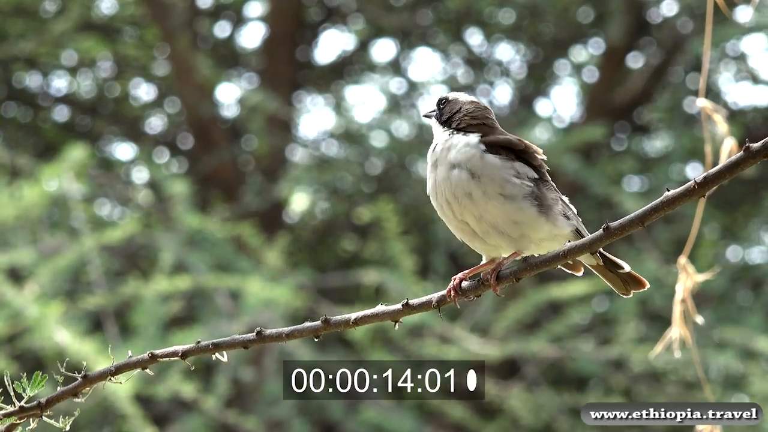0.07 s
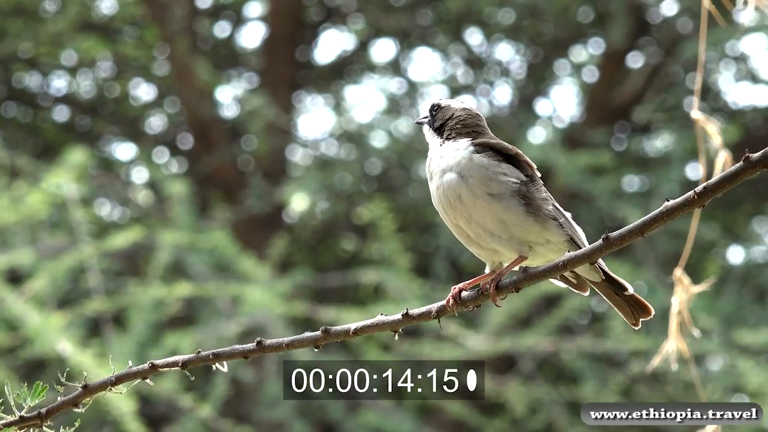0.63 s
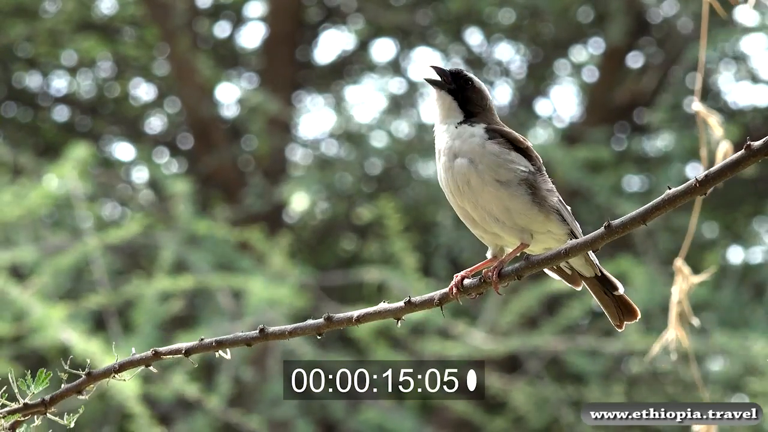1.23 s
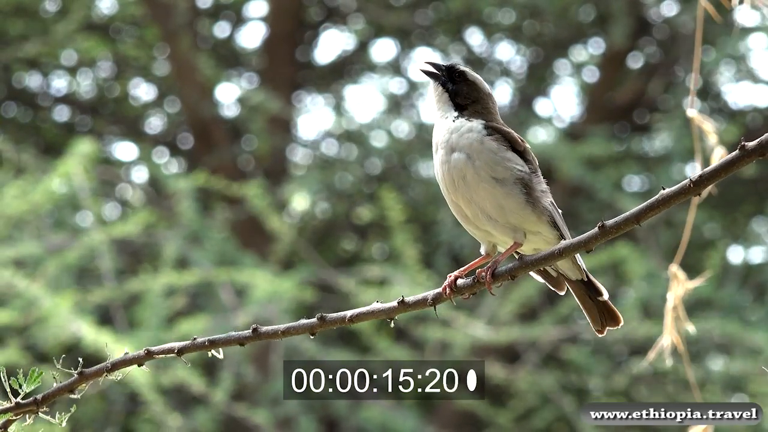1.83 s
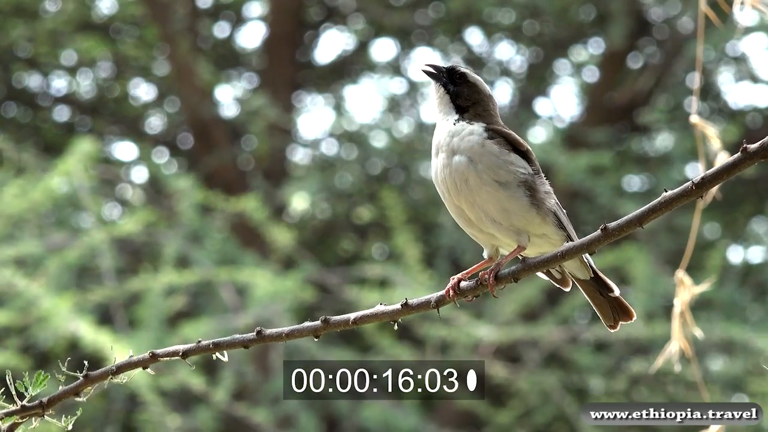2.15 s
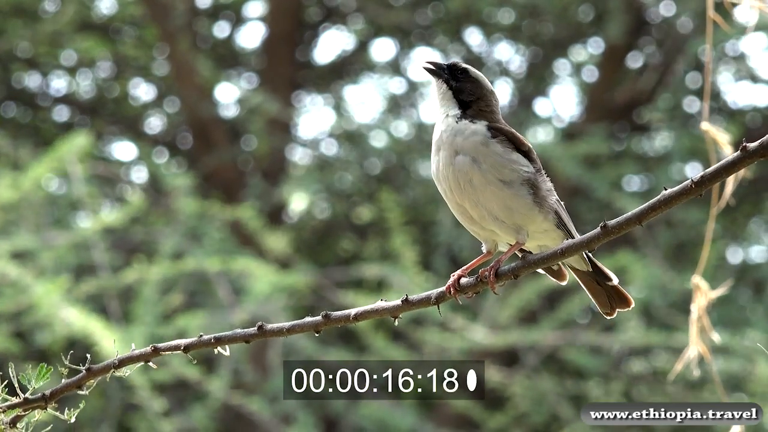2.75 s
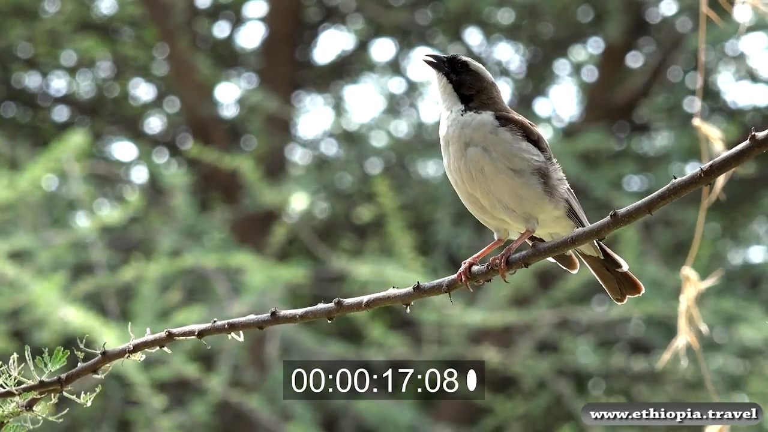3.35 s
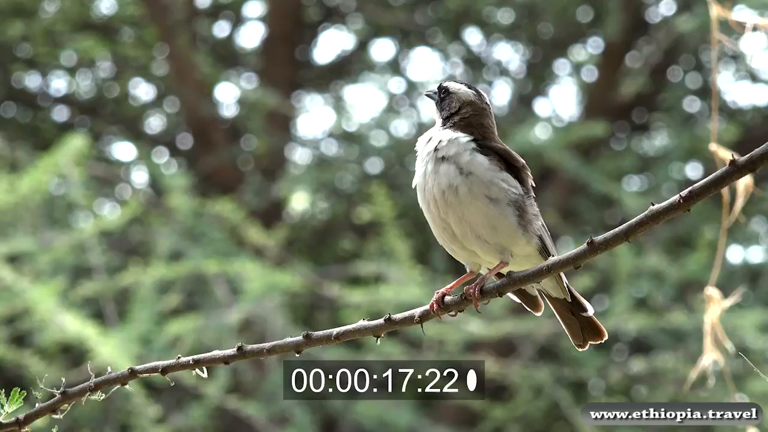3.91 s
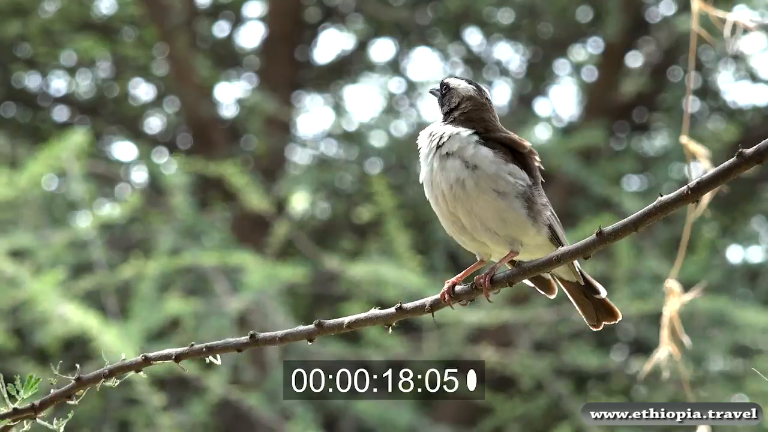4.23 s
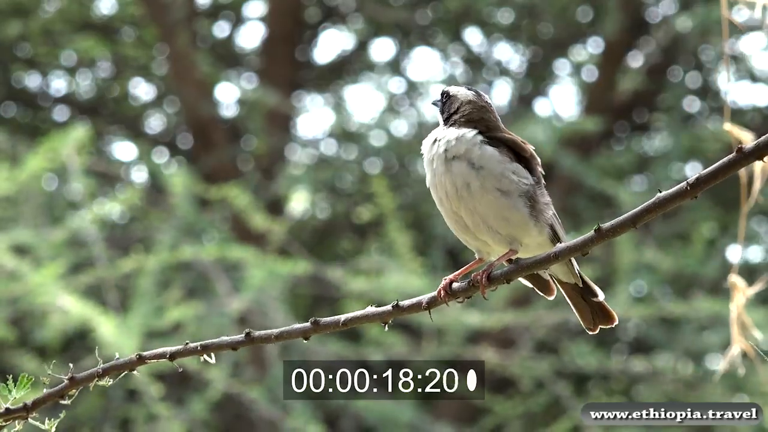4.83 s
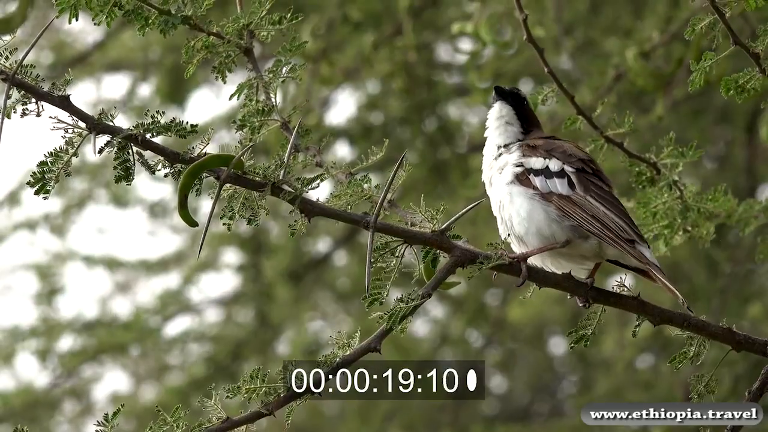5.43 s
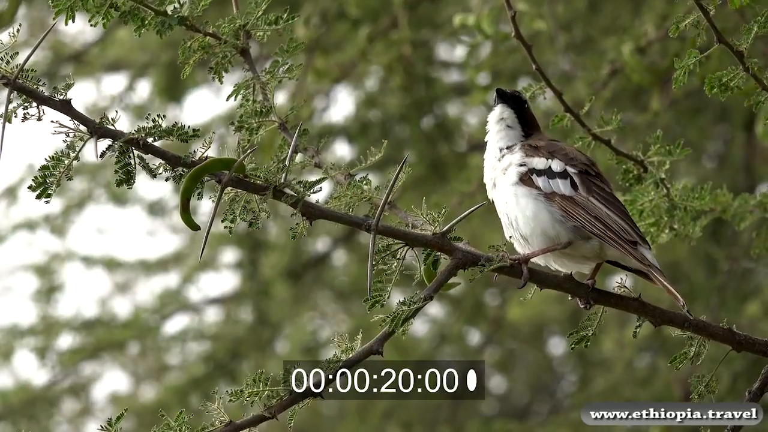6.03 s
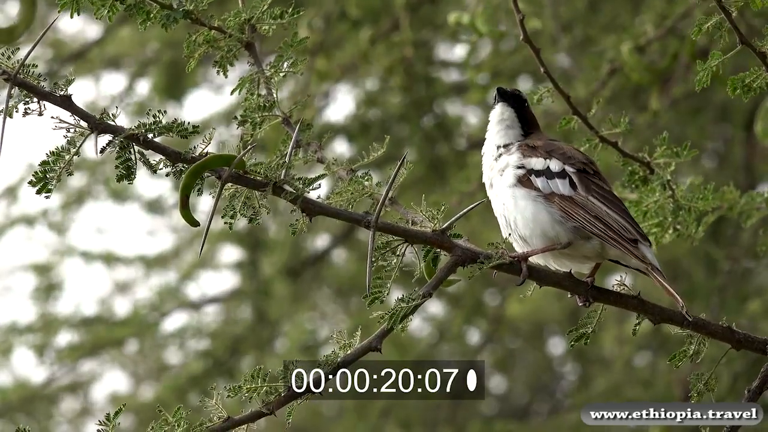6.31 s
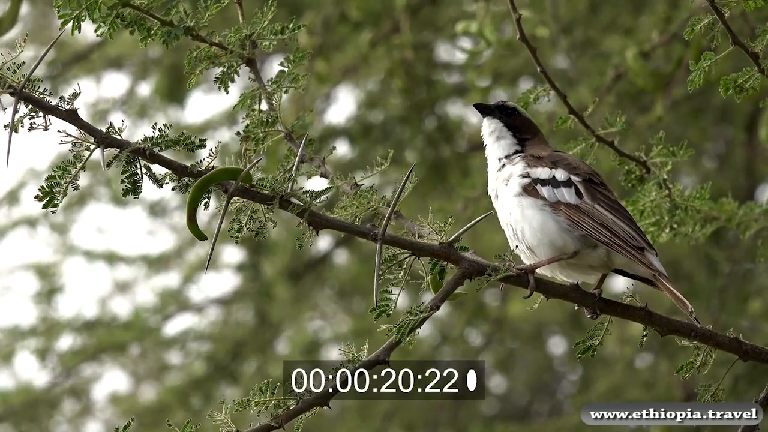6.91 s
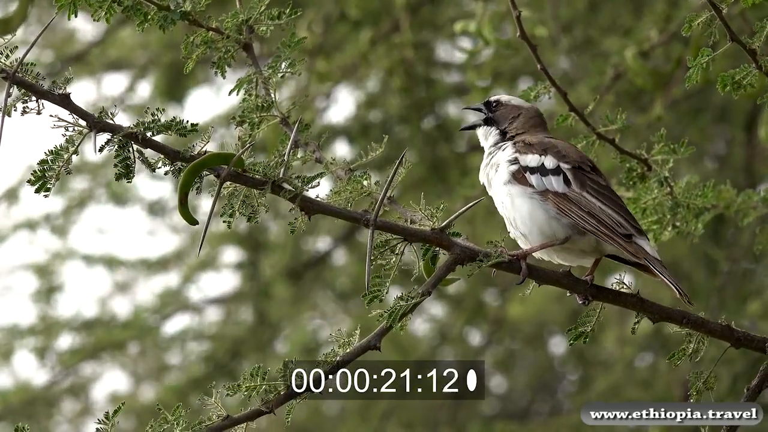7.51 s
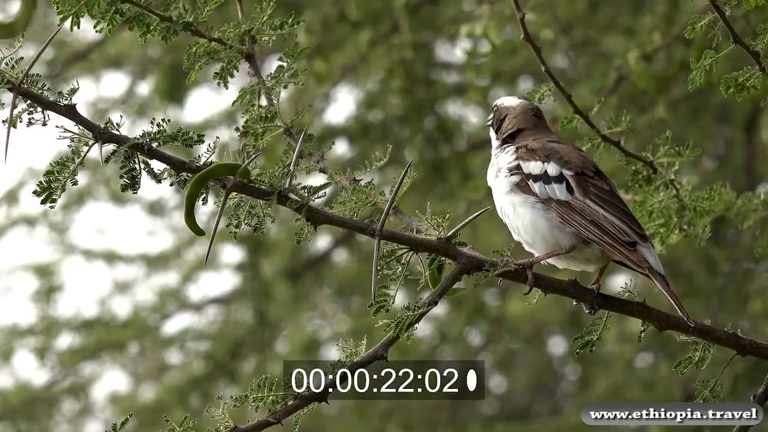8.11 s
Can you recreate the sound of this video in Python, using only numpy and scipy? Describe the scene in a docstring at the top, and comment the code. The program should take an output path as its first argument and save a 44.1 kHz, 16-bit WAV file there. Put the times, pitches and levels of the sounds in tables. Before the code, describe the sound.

Outdoors among trees, a songbird near the microphone starts with a quiet twitter, then breaks into fast, bright chatter of sliding chirps, clicks and buzzes. A low puff of wind hits the microphone early, over a faint hiss of leaves. The song stops briefly halfway through, then resumes in shorter clusters of squeaks, creaks and whistles, now with an even outdoor rumble behind it.

```python
"""A dull rush of air and a soft twitter come first, then a sparrow-weaver chatters on a branch close by.
Its voice box (the syrinx) makes gliding squeaks, ticks, rasps and buzzes, at times two at once, one from
each of its two sides. Leaves hiss, twigs scatter the song and a breeze bumps the microphone.
At five seconds the scene cuts to another perch, with a steady outdoor rumble behind the bird."""
import sys
import numpy as np
from scipy import signal
from scipy.fft import rfft, irfft
from scipy.io import wavfile

SR = 44100
rng = np.random.default_rng(int(sys.argv[2]) if len(sys.argv) > 2 else 0)


def materialize(psi):
    """Save the field psi as 16-bit PCM at rate SR to the path in sys.argv[1].

    A 1-D psi becomes a single channel; in a 2-D psi each row is a channel.
    """
    bounded = np.clip(np.atleast_2d(psi).T, -1, 1)
    quanta = np.round(bounded * 32767).astype(np.int16)
    wavfile.write(sys.argv[1], SR, quanta)


N = 359415
CUT_S = 5.017   # the second perch begins
CUTOFF_HZ = 16000
USUAL_NOTE_DB = -17.5
SWELL_DB_PER_S = 25   # the longer an arch or buzz, the softer it starts


def from_db(db):
    """Turn decibels into a multiplier."""
    return 10 ** (np.asarray(db) / 20)


def rms_one(x):
    """Scale a sound to an average power of 1."""
    return x / np.sqrt(np.mean(x ** 2))


def in_time(rows):
    """Join (time, value) points into a curve with one value per sample."""
    return np.interp(np.arange(N) / SR, *np.transpose(rows))


def at_hz(points, hz):
    """Read the level in dB at any frequency, between (frequency, level) points."""
    freqs, db = np.transpose(points)
    return np.interp(np.log(hz + 1), np.log(freqs), db)


def low_noise(size, top_hz):
    """Random wavering of power 1, mostly slower than top_hz."""
    return rms_one(signal.sosfilt(signal.butter(2, top_hz, fs=SR, output="sos"), rng.standard_normal(size)))


def air(colour, side_db=-19):
    """Noise with a given colour (its mix of low and high), nearly alike left and right."""
    gain = from_db(at_hz(colour, np.fft.rfftfreq(N, 1 / SR)))
    mid, side = rms_one(irfft(rfft(rng.standard_normal((2, N))) * gain, N))
    return mid + from_db(side_db) * np.array([side, -side])


def rumble(level_db=-34.5):
    """The steady low noise of the outdoors."""
    # colour of the rumble: f/Hz, level/dB
    colour = [(25, -20.5), (90, -4), (500, -14.5), (3000, -19), (15000, -50.5)]
    return from_db(level_db) * air(colour)


def leaves(level_db=-51):
    """Leaves give a faint, even hiss."""
    # colour of the hiss: f/Hz, level/dB
    colour = [(150, 0), (1500, -14.5), (5500, -6), (13000, -19.5)]
    return from_db(level_db) * air(colour)


def rush():
    """A dull rush of noise that fades within the first second."""
    # loudness of the rush: t/s, level/dB
    loudness = [(.46, -42.5), (.7, -64)]
    # colour of the rush: f/Hz, level/dB
    colour = [(400, -14.5), (1700, -7), (15000, -24.5)]
    return from_db(in_time(loudness)) * air(colour)


def breeze(lump_db=5.8):
    """Moving air bumps the microphone in low, uneven lumps."""
    # strength of the breeze: t/s, level/dB
    strength = [(.95, -53), (1.03, -25), (1.2, -41.5), (2.35, -53.5), (2.65, -70), (3.4, -56), (4.5, -59)]
    bumps = from_db(in_time(strength)) * low_noise(N, top_hz=109)
    return bumps * from_db(lump_db * low_noise(N, top_hz=7.5))


def foliage(song, near_db, near_t60=0.13, far_db=-25, far_t60=0.81, side_db=-11):
    """Near twigs give a short echo, far trees a faint tail; t60 is the seconds to fade by 60 dB."""
    t = np.arange(SR // 2) / SR
    decay = sum(from_db(db - 60 * t / t60) * np.sqrt(np.log(10 ** 6) / (t60 * SR))
                for db, t60 in ((near_db, near_t60), (far_db, far_t60)))
    echoes = decay * rng.standard_normal((2, len(t))) * (t > .002)
    mid, side = signal.fftconvolve(song[None], echoes, axes=1)[:, :N]
    return song + mid + from_db(side_db) * np.array([side, -side])


def first_perch(song, shade_hz=8250, sheen_hz=10200, sheen_db=3):
    """Here the song is brighter and comes from the right; on the left it is softer and duller."""
    sheen = from_db(at_hz([(shade_hz, 0), (sheen_hz, sheen_db)], np.fft.rfftfreq(N, 1 / SR)))
    left, right = foliage(irfft(rfft(song) * sheen, N), near_db=-7.0)
    left = signal.lfilter(*signal.iirnotch(shade_hz, Q=3, fs=SR), left)
    return np.array([left, right]) * from_db([[-1.6], [1.4]])


def throat_and_beak(pitch, level_db, beak_hz, beak_db):
    """The throat colours the harmonics (multiples of the pitch); the beak lifts those near beak_hz."""
    # colour of the throat: f/Hz, level/dB
    throat = [(500, -6), (1000, -12.5), (2200, -2), (4600, -2), (6200, -9.5), (8000, -7.5), (11000, -25.5),
              (14000, -25.5)]
    k = np.arange(1, CUTOFF_HZ / pitch.min())[:, None]
    hz = k * pitch
    beak = beak_db * np.exp(-(np.log2(hz / beak_hz) / .5) ** 2)
    dulling_db_per_octave = 0.16 * (USUAL_NOTE_DB - level_db)   # softer notes are duller
    gain = from_db(at_hz(throat, hz) + beak - dulling_db_per_octave * np.log2(k)) * (hz < CUTOFF_HZ)
    harmonics = gain * np.cos(2 * np.pi * k * np.cumsum(pitch) / SR)
    return np.sum(harmonics, axis=0) / np.linalg.norm(gain, axis=0)


def add_note(song, start, level_db, beak_hz, arc, hoarse, warble=0, warble_hz=101.98,
             slowness=1, fade_db=0, swell_db=0, beak_db=10.0):
    """One side of the syrinx vibrates along arc, a pitch curve in Hz, and adds a note to the song."""
    # the vibration takes some cycles to build up and to die, so low notes swell slowly
    cycles = slowness * np.array([16.0, 12])
    lead, trail = np.minimum(cycles / arc[[0, -1]] * SR, len(arc) / 2).astype(int) // 2 + 1
    arc = np.pad(arc, (lead, trail), mode="edge")
    size = len(arc)
    # a hoarse voice shakes in pitch (jitter) and in loudness (flutter)
    hoarse = np.clip(hoarse, 0, 1.2)
    jitter, flutter = .006 + .018 * hoarse, .13 + .42 * hoarse
    # slack membranes, at low pitch, vibrate less evenly
    waver = jitter * np.sqrt(beak_hz / arc) * low_noise(size, top_hz=600)
    # each swing of the warble jumps up and slides down; the slide down is the loud half
    swing_hz = warble_hz * (1 + 0.137 * low_noise(size, top_hz=87))
    angle = 2 * np.pi * np.cumsum(swing_hz) / SR
    pitch = arc * np.exp(warble * (np.sin(angle) + 0.25 * np.sin(2 * angle)) + waver)
    throb = 1 - 2.5 * warble * np.cos(angle)
    tone = throat_and_beak(pitch, level_db, beak_hz, beak_db)
    tone = rms_one(tone * (1 + flutter * low_noise(size, top_hz=470)) * throb)
    i = np.arange(size)
    soft_edges = np.sin(np.pi / 2 * np.clip(np.minimum(i / lead, i[::-1] / trail) / 2, 0, 1)) ** 2
    soft_start_db = swell_db * np.maximum(1 - 2 * i / size, 0) ** 2
    pressure_db = 3.0 * np.log2(arc / arc.max())   # air pressure raises pitch and loudness together
    note = tone * soft_edges * from_db(level_db - soft_start_db + pressure_db + fade_db * (.5 - i / size))
    first = int(start * SR) - lead
    song[first:first + size] += note[:N - first]


def arch(length, turn_hz, place, bend):
    """A pitch curve that turns at place (0 start, 1 end); its farther end is bend octaves lower."""
    way = np.linspace(0, 1, max(int(length * SR), 2))
    return turn_hz * 2 ** (-bend * ((way - place) / max(place, 1 - place)) ** 2)


def twitter(song, start_s=0.23, last_s=0.5, last_db=-37, typical_hz=1100, length_s=0.028):
    """Ten soft, random squeaks grow louder and lead into the song."""
    for start, (octaves, place, bend) in zip(np.linspace(start_s, last_s, 10), rng.random((10, 3))):
        hz = typical_hz * 2 ** (octaves - .5)
        level_db = last_db + 10 * np.log10(start / last_s)
        add_note(song, start, level_db, 2 * hz, arch(length_s, hz, place, bend), hoarse=0.46)


def drawls(song):
    """Two long notes, beak half open: a creak tightens to a nasal tone, a whistle drops to a squawk."""
    # long notes: level/dB, beak resonance/Hz, warble depth, pitch path as points of (t/s, f/Hz)
    notes = [(-23.5, 3900, 0.039, [(5.495, 190.2), (5.61, 675.5), (5.735, 691), (5.75, 540)]),
             (-16.5, 4600, 0, [(6.308, 1357), (6.322, 2330), (6.36, 2680), (6.371, 2430), (6.382, 789),
             (6.397, 768), (6.409, 1104), (6.438, 600)])]
    for level_db, beak_hz, depth, path in notes:
        times, hz = np.transpose(path)
        arc = np.exp(np.interp(np.arange(times[0], times[-1], 1 / SR), times, np.log(hz)))
        add_note(song, times[0], level_db, beak_hz, arc, hoarse=0, warble=depth, beak_db=5.5)


def flicks(song, rise_s=.018, sharpness=1.4):
    """A twitch tightens the syrinx: the pitch shoots up to a point, then relaxes."""
    # twitches: top t/s, fall time/s, level/dB, top f/Hz, slack f/Hz, hoarseness (0 is clean)
    notes = [(1.516, 0.057, -22, 2330, 1111, 0.06), (2.099, 0.033, -16.5, 1793, 952, 0),
             (2.155, 0.035, -17.5, 2130, 932, 0), (2.957, 0.075, -26, 2760, 1220, 0.03),
             (3.636, 0.033, -20.5, 2070, 996, 0), (3.694, 0.048, -20.5, 2552, 1163, 0),
             (3.979, 0.028, -18, 2300, 1354, 0.5), (5.152, 0.05, -13.5, 4450, 1584, 0.16),
             (5.219, 0.068, -16, 3080, 1750, 0), (5.266, 0.072, -20.5, 1433, 781, 0.75),
             (6.005, 0.03, -20.5, 1770, 835, 0.3), (6.759, 0.076, -22.5, 2365, 1118, 0.45)]
    for top_s, fall, level_db, top_hz, slack_hz, hoarse in notes:
        t = np.arange(-rise_s, fall, 1 / SR)
        tension = np.clip(1 - np.maximum(-t / rise_s, t / fall), 0, 1) ** sharpness
        arc = slack_hz * (top_hz / slack_hz) ** tension
        beak_hz = 3410 * 2 ** (-0.06 * (level_db - USUAL_NOTE_DB))   # lower for a louder flick
        add_note(song, top_s - rise_s, level_db, beak_hz, arc, hoarse)


def buzzes(song, beak_hz=4980, rasp_beak_hz=3280, rasp_db=-10):
    """A fast warble turns an arching note into a buzz."""
    # buzzes: start t/s, length/s, level/dB, turn f/Hz, place of the turn (0-1), bend/octaves, warble depth
    notes = [(0.709, 0.074, -36, 5200, 0.7, 0.067, 0.08), (1.706, 0.052, -16.5, 4790, 1, 0.88, 0.11),
             (2.327, 0.12, -16, 5036, 0.7, 0.32, 0.09), (3.047, 0.11, -20.5, 2210, 0.4, 0.15, 0.07),
             (3.211, 0.085, -18.5, 2676, 0.34, -0.029, 0.045),
             (3.856, 0.066, -16.5, 6320, 0.95, 0.48, 0.06), (6.909, 0.18, -17, 2417, 0.26, 0.51, 0.13),
             (7.868, 0.058, -18, 4640, 0.03, 0.1, 0.14)]
    for start, length, level_db, turn_hz, place, bend, depth in notes:
        arc = arch(length, turn_hz, place, bend)
        swell_db = SWELL_DB_PER_S * length
        add_note(song, start, level_db, beak_hz, arc, hoarse=0.51, warble=depth,
                 slowness=4.5, swell_db=swell_db)
        if start < CUT_S:   # at the first perch the other side of the syrinx rasps an octave below
            add_note(song, start, level_db + rasp_db, rasp_beak_hz, arc / 2, hoarse=0.95,
                     warble=2 * depth, swell_db=swell_db)


def arches(song):
    """Rounded squeaks swell gently as the pitch rises and falls; a negative bend dips instead."""
    # squeaks: start t/s, length/s, level/dB, beak resonance/Hz, turn f/Hz, place of the turn (0-1),
    # bend/octaves, hoarseness (0 is clean)
    notes = [(0.792, 0.16, -24.5, 2200, 860, 0.99, 1.0, 0.8),
             (0.917, 0.11, -21.5, 5000, 1007, 0.58, 0.29, 0.24),
             (1.289, 0.12, -28, 2140, 945, 0.35, 0.42, 1.08),
             (1.415, 0.11, -26.5, 2360, 987, 0.54, 0.2, 1.15),
             (1.792, 0.024, -17.5, 4170, 1554, 0.75, 0.6, 0.15),
             (1.815, 0.082, -19, 5140, 1392, 0.51, 0.43, 0),
             (2.02, 0.061, -19.5, 3944, 1138, 0.49, 0.34, 0),
             (2.187, 0.095, -22, 2500, 1361, 0.59, 0.65, 0),
             (2.44, 0.11, -23.5, 4400, 1164, 0.47, -0.15, 0.87),
             (2.495, 0.064, -18.5, 6100, 4090, 0.5, 0.91, 0.9),
             (2.56, 0.044, -18.5, 7200, 4140, 0.64, 0.97, 0.54),
             (2.697, 0.058, -17.5, 4900, 2434, 0.99, 0.3, 0),
             (2.755, 0.07, -16.5, 4000, 1126, 0.63, -1.02, 0),
             (3.157, 0.066, -17.5, 5260, 2670, 0.65, 0.032, 0.4),
             (3.558, 0.062, -24, 4200, 1159, 0.562, 0.22, 0), (3.727, 0.066, -21, 3400, 2054, 0.8, 1.1, 0),
             (4.011, 0.09, -17.5, 5700, 3974, 0.5, 1.2, 0.45),
             (5.017, 0.053, -17.5, 4240, 1687, 1, -0.37, 0.2),
             (5.875, 0.11, -23.5, 2030, 1060, 0.5, 0.61, 0.38),
             (6.031, 0.082, -25.5, 2080, 1154, 0.65, 0.62, 0.1),
             (6.139, 0.02, -23, 5340, 272, 0.925, 0.57, 0.82),
             (6.189, 0.033, -14, 5950, 5510, 0.03, -0.3, 0.1),
             (6.527, 0.14, -30.5, 1800, 1688, 0.68, 0.45, 0.7),
             (6.642, 0.041, -24.5, 1750, 3950, 0.82, 1.2, 0.2),
             (6.688, 0.053, -18, 3160, 1960, 0.96, 1.1, 0.65),
             (7.215, 0.067, -18, 5100, 2440, 1.0, 0.59, 0.2),
             (7.535, 0.06, -19.5, 4080, 2656, 0.57, 0.2, 0.6),
             (7.586, 0.075, -18.5, 3970, 2616, 0.48, 0.608, 1.24),
             (7.646, 0.076, -19, 3020, 3690, 0.42, 1.22, 0.4),
             (7.95, 0.063, -28, 2430, 1600, 0.33, 0.64, 0.13),
             (8.04, 0.094, -19.5, 4600, 1200, 0.05, 0.76, 0.05)]
    for start, length, level_db, beak_hz, turn_hz, place, bend, hoarse in notes:
        add_note(song, start, level_db, beak_hz, arch(length, turn_hz, place, bend), hoarse,
                 slowness=1.4, swell_db=SWELL_DB_PER_S * length)


def slurs(song, plunge_s=.0065, sag_s=.12):
    """Quick slides, mostly downward, start hard and then level off; the shortest sound like ticks."""
    # slides: start t/s, length/s, level/dB, beak resonance/Hz, first f/Hz, last f/Hz, hoarseness
    notes = [(0.68, 0.043, -36.5, 4712, 6050, 4170, 0.7), (1.073, 0.0076, -15.5, 4240, 5680, 2260, 0.3),
             (1.109, 0.032, -16.5, 4700, 6920, 2160, 0.3), (1.153, 0.0076, -14.5, 3160, 4812, 3900, 0.4),
             (1.168, 0.039, -16, 4860, 5010, 1770, 1.3), (1.306, 0.045, -16.5, 5230, 4830, 1916, 0.9),
             (1.356, 0.041, -17, 5000, 4660, 1810, 0.6), (1.442, 0.036, -17.5, 4100, 5931, 3680, 0.4),
             (1.769, 0.02, -17.5, 3550, 4744, 2190, 0.1), (2.41, 0.035, -21.5, 3760, 5110, 2486, 1),
             (2.468, 0.03, -17, 5700, 6900, 2770, 0.7), (2.607, 0.033, -18, 5900, 3900, 2004, 0.6),
             (2.832, 0.0043, -14, 3978, 4130, 6150, 0.3), (2.864, 0.035, -18.5, 2340, 4775, 1940, 0.07),
             (3.933, 0.037, -16.5, 5270, 7940, 2745, 0.24), (5.349, 0.0054, -12, 3885, 4030, 5800, 0.7),
             (5.388, 0.076, -17, 2000, 7150, 1430, 0), (6.164, 0.0059, -15, 3840, 4300, 2400, 0.2),
             (6.179, 0.0059, -13.5, 6400, 5960, 2500, 0.1), (6.237, 0.054, -15, 5300, 5525, 3150, 0.05),
             (7.273, 0.0071, -14, 4350, 2590, 5730, 0), (7.311, 0.058, -16, 3930, 5754, 1723, 0.56),
             (7.932, 0.014, -16.5, 3060, 4130, 1770, 0.1)]
    for start, length, level_db, beak_hz, first_hz, last_hz, hoarse in notes:
        t = np.arange(max(int(length * SR), 2)) / SR
        way = 1 - np.exp(-t / plunge_s) + t / sag_s
        arc = first_hz * (last_hz / first_hz) ** (way / way[-1])
        add_note(song, start, level_db, beak_hz, arc, hoarse, fade_db=3)


def bird(lowest_hz=780):
    """The song is strung from six kinds of note; so small a body gives off no bass."""
    song = np.zeros(N)
    for add_notes in (slurs, flicks, arches, buzzes, drawls, twitter):
        add_notes(song)
    return signal.sosfilt(signal.butter(6, lowest_hz, "high", fs=SR, output="sos"), song)


def scene():
    """The bird sings at two perches in turn: first in breeze and hiss, then over a rumble."""
    song = bird()
    first = breeze() + leaves() + rush() + first_perch(song)
    second = foliage(song, near_db=-9.5) + rumble()
    return np.where(np.arange(N) / SR < CUT_S, first, second)


def record(dry, ceiling=0.47):
    """The loudest peaks are rounded off and the highest treble is cut steeply."""
    rounded = dry / (1 + (dry / ceiling) ** 6) ** (1 / 6)
    return signal.sosfilt(signal.ellip(10, .1, 80, CUTOFF_HZ, fs=SR, output="sos"), rounded)


dry = scene()
out = record(dry)
materialize(out)
```